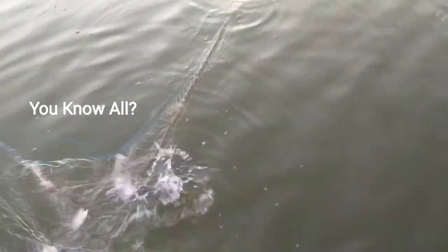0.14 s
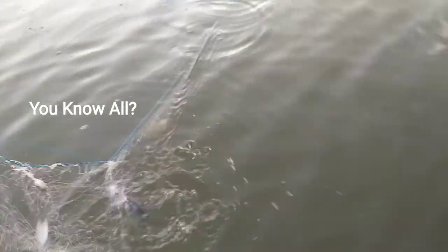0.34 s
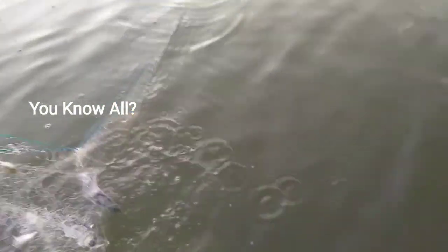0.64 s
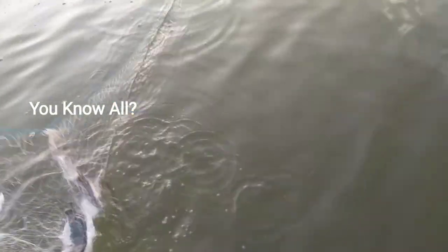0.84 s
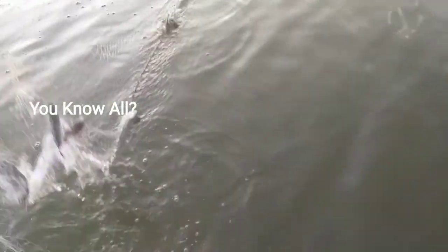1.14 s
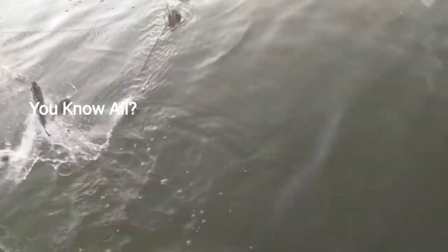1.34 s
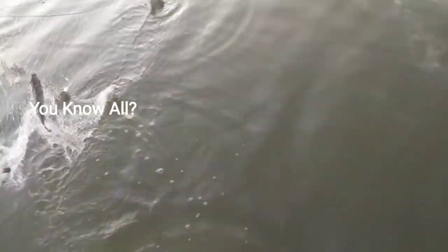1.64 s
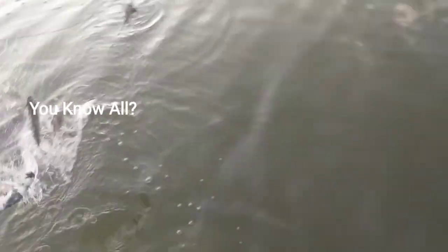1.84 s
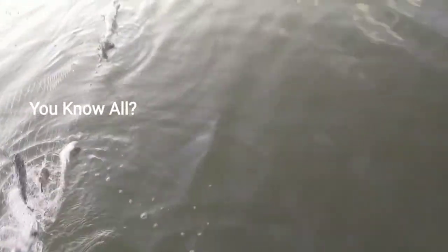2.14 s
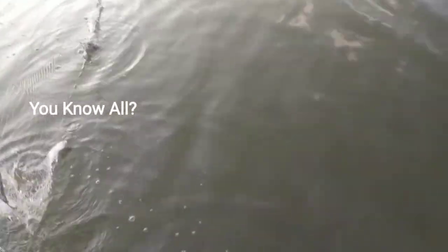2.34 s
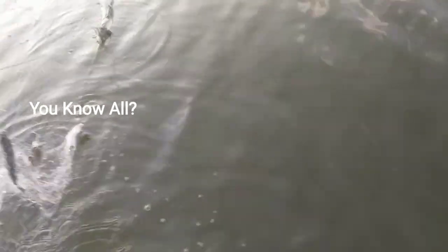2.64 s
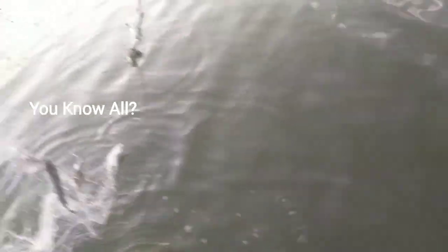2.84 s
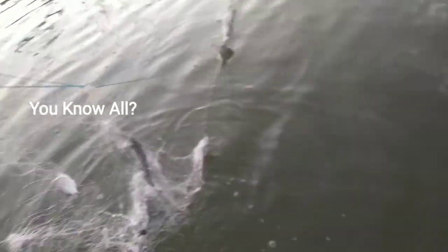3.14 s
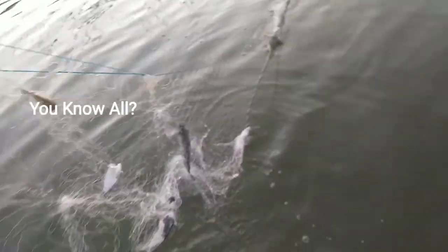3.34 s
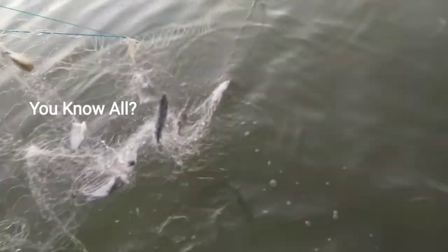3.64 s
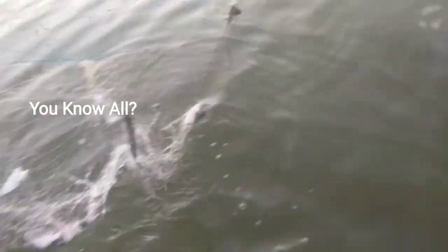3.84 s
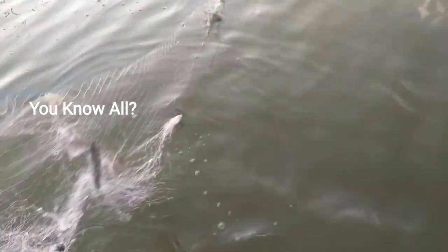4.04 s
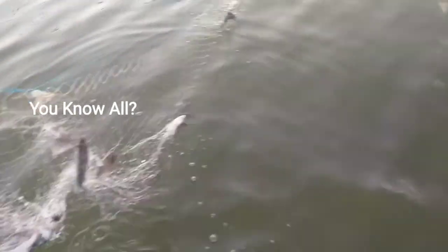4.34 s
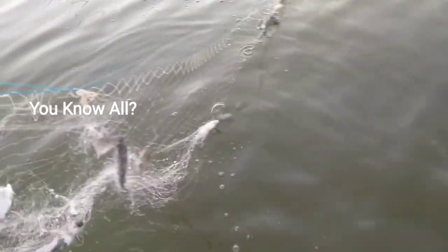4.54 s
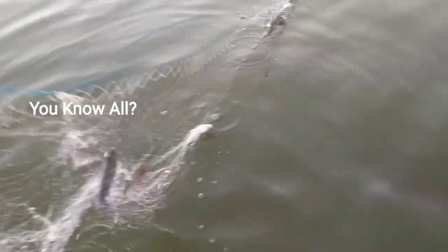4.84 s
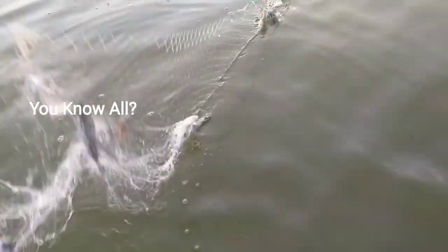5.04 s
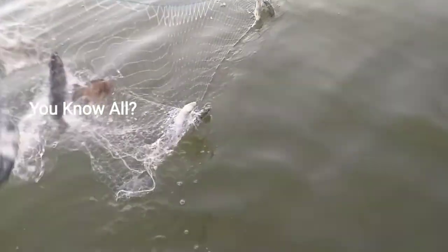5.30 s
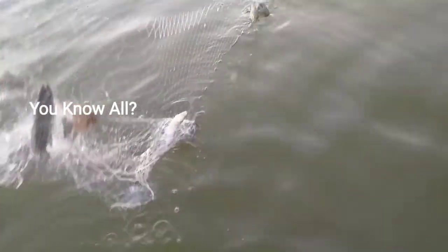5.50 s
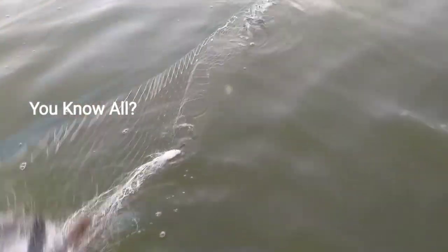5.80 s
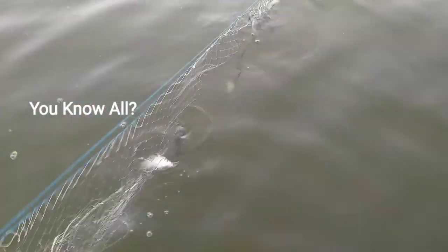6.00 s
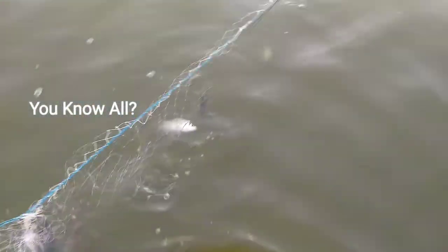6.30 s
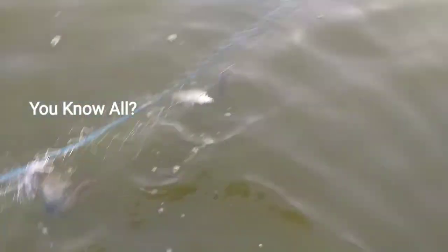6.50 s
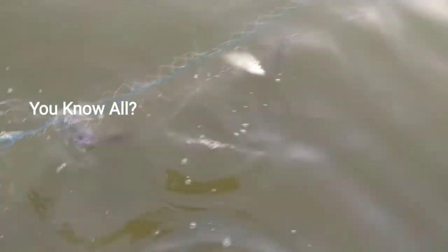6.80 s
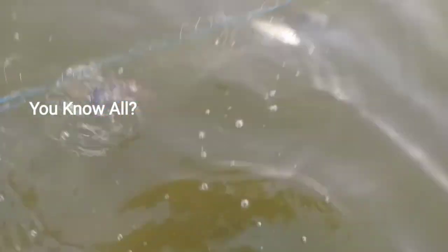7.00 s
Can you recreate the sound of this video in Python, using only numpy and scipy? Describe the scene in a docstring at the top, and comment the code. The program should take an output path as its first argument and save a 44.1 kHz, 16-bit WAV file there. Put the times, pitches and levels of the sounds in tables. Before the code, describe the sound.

Two bouts of close, bright splashing dominate the first half, the first abrupt and spitting, the second fuller with slosh, slaps and gurgling bubbles. Afterwards the lake is quiet, with only tiny drips and little plops. Low wind buffets come and go on the close microphone in open air. Falling bird whistles, rapid high chirps, faint insect rasps and a weak far engine fill the gaps over soft hiss.

```python
"""Splashing water leads: a net with fish is hauled out of a lake by hand, in two bouts of surges.
Burst-modulated noise gives spray and slosh; snapping cavities give smacks; damped tones give bubbles;
sparse ringing grains give drips. Filtered pulses and single eddies of light wind buffet the microphone.
Gliding tones make birds whistle and chirp, gated noise makes insects buzz, and summed harmonics of a
firing rate make a small engine rev far off, over a steady hiss and a thin tone."""
import sys
import numpy as np
from scipy import signal
from scipy.fft import rfft, irfft, next_fast_len
from scipy.io import wavfile
from scipy.ndimage import uniform_filter1d

SR = 44100
rng = np.random.default_rng(int(sys.argv[2]) if len(sys.argv) > 2 else 0)


def transcribe(signal):
    """Save signal, clipped to [-1, 1], as a 16-bit WAV file at the path in sys.argv[1]."""
    frames = np.atleast_2d(signal).T
    limited = np.clip(frames, -1, 1)
    pcm = np.round(limited * 32767).astype(np.int16)
    wavfile.write(sys.argv[1], SR, pcm)


N = 315756


def gain_of(db):
    """Logarithmic level: decibels become an amplitude ratio."""
    return 10 ** (np.asarray(db) / 20)


def evened(x):
    """Power normalisation: scales a signal to rms 1."""
    return x / np.sqrt(np.mean(x ** 2) + 1e-20)


def read(points, hz):
    """Interpolation of a spectrum, linear in its value over log frequency."""
    f, value = np.transpose(points)
    return np.interp(np.log(hz + 1), np.log(f + 1), value)


def colour(x, shape):
    """Linear filtering: multiplies the spectrum by a gain given as a function of frequency."""
    size = next_fast_len(x.shape[-1])
    gain = shape(np.fft.rfftfreq(size, 1 / SR))
    return irfft(rfft(x, size) * gain, size)[..., :x.shape[-1]]


def add(mix, s, sound):
    """Superposition: adds a sound to the mix from time s."""
    part = mix[max(round(s * SR), 0):][:len(sound)]
    part += sound[:len(part)]


def train(per_s, spread_db):
    """Random point process: clicks of either sign, mostly small, a few large."""
    chance = rng.uniform(-1, 1, N) * SR / per_s
    hit = abs(chance) < 1
    size_db = spread_db * np.minimum(-np.log(abs(chance[hit])), 4)
    out = np.zeros(N)
    out[hit] = np.sign(chance[hit]) * gain_of(size_db)
    return out


# Hiss over the lake, relative spectrum: f/Hz, level/dB per Hz
AIR_SPECTRUM = [(150, -37), (250, -13.5), (500, -18.5), (1300, -23.5), (4500, -21), (5800, -17),
                (6300, -15.5), (7500, -15.5), (8400, -6.5), (9500, -22.5), (10500, -31.5), (13000, -21.5),
                (15000, -31.5), (16000, -34.5)]
AIR_DB = -66.5  # rms


def air():
    """Stationary noise: even hiss, made patchy where a far insect chorus swells and fades."""
    frames, hz = N // 128 + 5, np.fft.rfftfreq(512, 1 / SR)
    real, imaginary, patches = rng.standard_normal((frames, 257, 3)).T
    patches = uniform_filter1d(patches, 8, 0)  # smooth over frequency
    patches = evened(uniform_filter1d(patches, 25, 1))  # smooth over time
    patchy_db = 2.2 + 1.4 * np.exp(-((hz - 7000) / 2200) ** 2)  # most uneven near 7 kHz
    level_db = read(AIR_SPECTRUM, hz)[:, None] + patchy_db[:, None] * patches
    frames_spectrum = (real + 1j * imaginary) * gain_of(level_db)
    hiss = signal.istft(frames_spectrum, nperseg=512, noverlap=384)[1][:N]
    return gain_of(AIR_DB) * evened(hiss)


# Thin steady tone: f/Hz, rms level/dB
STEADY_TONE = [(13291, -79)]


def whine():
    """Pure tone: a sinusoid of constant frequency and level."""
    t = np.arange(N) / SR
    return sum(np.sqrt(2) * gain_of(db) * np.sin(2 * np.pi * f * t) for f, db in STEADY_TONE)


# Course of the wind noise: t/s, level/dB
GUST_LEVELS = [(0.03, -49.5), (0.2, -60.5), (0.33, -44), (0.75, -50), (0.95, -39), (1.15, -48), (1.65, -48),
               (1.8, -54.5), (2, -47.5), (2.38, -72), (2.7, -56), (3.3, -60), (3.601, -65.5), (3.72, -44.5),
               (4.05, -55), (4.13, -75), (4.25, -52), (4.42, -56), (4.55, -41.5), (4.95, -54), (5.1, -42),
               (5.42, -53), (5.8, -57), (6.28, -56), (6.45, -59.5), (6.6, -48), (6.8, -60)]
# Relative spectrum of the wind noise: f/Hz, level/dB per Hz
WIND_SPECTRUM = [(15, -45.5), (25, -24), (86, -2), (162, -0.5), (265, -8), (346, -19.5), (483, -33),
                 (717, -48), (1100, -59), (1430, -80), (2420, -120)]


def gusts():
    """Turbulent pressure fluctuation: lumpy pulses and noise, low-frequency coloured."""
    s, db = np.transpose(GUST_LEVELS)
    lumps = evened(train(75, 4.0)) + 0.65 * rng.standard_normal(N)
    rumble = evened(colour(lumps, lambda hz: gain_of(read(WIND_SPECTRUM, hz))))
    return rumble * gain_of(np.interp(np.arange(N) / SR, s, db))


# Strongest eddies thumping the microphone: onset t/s, envelope peak level/dB, centre f/Hz
EDDIES = [(0.061, -30.5, 147), (0.33, -28, 225), (0.38, -24.5, 257), (0.535, -31.5, 113), (0.931, -22, 255),
          (1.003, -25, 235), (1.052, -30.5, 202), (1.09, -25.5, 340), (1.175, -27.5, 156),
          (1.577, -30.5, 150), (1.651, -33.5, 125), (1.983, -28.5, 153), (2.763, -25.5, 250),
          (3.249, -35, 100), (3.677, -33.5, 108), (3.747, -32, 169), (3.768, -31.5, 230),
          (3.809, -32, 180.4), (4.235, -33.5, 148.3), (4.271, -32.5, 146), (4.523, -27.5, 255),
          (4.587, -31, 200), (4.652, -23.5, 215), (4.795, -34.5, 177), (4.871, -28.5, 178),
          (4.96, -28, 127), (5.047, -31, 118), (5.088, -30, 173.5), (5.225, -28, 164),
          (5.266, -31.5, 178.6), (5.295, -30.5, 170), (5.351, -33, 133), (5.439, -37, 119.6),
          (5.636, -39, 149), (5.94, -39, 177), (6.243, -33.5, 154), (6.556, -33.5, 160),
          (6.609, -35.5, 105)]
THUMP_BUILD_S, THUMP_CORE = .0098, .64  # from onset to peak; share of the sharp core


def thumps():
    """Wave packet: each eddy is one short swing of pressure with a sharper core, in random phase."""
    out = np.zeros(N)
    t = np.arange(-900, 900) / SR  # zero at the peak
    for (s, db, hz), turn in zip(EDDIES, rng.random(len(EDDIES))):
        swing = (1 - THUMP_CORE) * np.exp(-(t * hz / 0.77) ** 2)
        core = THUMP_CORE * np.exp(-(t * hz / 0.26) ** 2)
        carrier = np.cos(2 * np.pi * (hz * t + turn))
        add(out, s + THUMP_BUILD_S + t[0], gain_of(db) * carrier * (swing + core))
    return out


# Far engine: t/s, firing rate f/Hz, level/dB
ENGINE_COURSE = [(5.398, 39.4, -63), (5.5, 32.8, -60), (5.6, 39.2, -53), (5.77, 41.3, -58.5),
                 (6.019, 39.6, -55.5), (6.121, 41, -70.5), (6.471, 33.7, -74), (6.891, 27.3, -70.5),
                 (7.16, 30, -62)]


def engine():
    """Harmonic series: one puff a firing; low orders near the pipe resonance carry across the water."""
    s, per_s, db = np.transpose(ENGINE_COURSE)
    t = np.arange(s[0], s[-1], 1 / SR)
    hz = np.interp(t, s, per_s)
    turns = np.cumsum(hz) / SR
    puffs = np.zeros(len(t))
    for order in range(2, 12):
        resonance = 1 / (1 + (np.log(order * hz / 205) / .24) ** 2) ** 1.6  # centred on 205 Hz
        puffs += np.cos(2 * np.pi * order * turns) * resonance
    fade_in = np.minimum((t - s[0]) / 0.11, 1)
    out = np.zeros(N)
    add(out, s[0], gain_of(np.interp(t, s, db)) * evened(puffs) * fade_in)
    return out


def rasp(length, centre_hz, width_hz, per_s):
    """Amplitude modulation: regular wing strokes gate a band of noise."""
    t = np.arange(0, length, 1 / SR)
    noise = rng.standard_normal(2 * SR)
    band = colour(noise, lambda hz: np.exp(-((hz - centre_hz) / width_hz) ** 2))[:len(t)]
    strokes = 0.39 + np.sin(np.pi * per_s * t) ** 2
    return evened(band * strokes) * signal.windows.tukey(len(t), min(0.04 / length, 1))


# High insect buzzes: start t/s, length t/s, level before end fades/dB, centre f/Hz
HIGH_BUZZES = [(1.13, 0.088, -58.5, 8360), (1.475, 0.12, -58, 8130), (1.633, 0.12, -62.5, 7800),
               (1.799, 0.097, -58, 8260), (2.0, 0.12, -60, 7900), (3.502, 0.073, -61.5, 8350),
               (3.826, .1, -66, 8460), (4.171, 0.12, -69, 8400), (4.752, 0.14, -66.5, 7520),
               (4.957, 0.05, -70, 8600), (5.099, 0.25, -68.5, 6660), (5.618, 0.116, -73, 8400),
               (6.3, 0.083, -70.5, 8270), (6.564, 0.1, -69.5, 8400), (6.988, 0.076, -63.5, 7690)]
BUZZ_WIDTH_HZ, BUZZ_PER_S = 850, 200  # noise band; wing strokes


def buzzes():
    """Gated narrow-band noise: short high buzzes."""
    out = np.zeros(N)
    for s, length, db, hz in HIGH_BUZZES:
        add(out, s, gain_of(db) * rasp(length, hz, BUZZ_WIDTH_HZ, BUZZ_PER_S))
    return out


# Low rasps of a further insect: start t/s, length t/s, level before end fades/dB, centre f/Hz
LOW_RASPS = [(3.65, 0.12, -72.5, 3000), (4.03, .05, -73, 2940), (4.505, .08, -78, 2900),
             (4.657, 0.11, -79.5, 2700)]
RASP_WIDTH_HZ, RASP_PER_S = 300, 100  # noise band; wing strokes


def low_rasps():
    """Gated narrow-band noise at a lower centre and stroke rate."""
    out = np.zeros(N)
    for s, length, db, hz in LOW_RASPS:
        add(out, s, gain_of(db) * rasp(length, hz, RASP_WIDTH_HZ, RASP_PER_S))
    return out


# One long trill: start t/s, length t/s, level before fading/dB, centre f/Hz, width f/Hz, stroke rate f/Hz
LONG_TRILL = (3.28, .95, -70, 5150, 230, 41)


def cricket():
    """Gated narrow-band noise with slow strokes, its level falling linearly in decibels."""
    s, length, db, *voice = LONG_TRILL
    trill = rasp(length, *voice)
    out = np.zeros(N)
    add(out, s, gain_of(db + np.linspace(0, -8, len(trill))) * trill)
    return out


def flock():
    """Random superposition: many small birds far off, faint falling chirps in runs of three."""
    out, u = np.zeros(N), np.linspace(0, 1, 1600)
    envelope = np.sin(np.pi * np.minimum(2.3 * u, 1))  # silent for the rest of each chirp period
    for hz in np.geomspace(5500, 7000, num=7):
        chirp = envelope * np.sin(2 * np.pi * np.cumsum(hz * (1 - 0.3 * u)) / SR)
        out += signal.oaconvolve(train(2.6, 2.3), np.tile(chirp, 3))[:N]
    return gain_of(-78.5) * evened(out)


def glide(start_hz, end_hz, length):
    """Frequency modulation: one short chirp whose pitch slides ever faster."""
    u = np.linspace(0, 1, int(length * SR))
    hz = start_hz + (end_hz - start_hz) * u ** 1.71
    return np.sin(np.pi * u) ** 0.34 * np.sin(2 * np.pi * np.cumsum(hz) / SR)


# Lower single calls: start t/s, peak level/dB, start f/Hz, end f/Hz, length t/s
SINGLE_CALLS = [(1.444, -61, 2440, 2450, 0.053), (1.516, -64.5, 2480, 2160, 0.042),
                (4.239, -71, 3510, 2950, .05), (5.245, -66, 3670, 3130, 0.061),
                (5.551, -65, 3670, 2810, 0.076), (5.72, -79, 1700, 1570, .18),
                (6.175, -76, 1620, 1570, 0.086), (6.101, -63, 2830, 2720, 0.084),
                (6.403, -71, 3240, 2965, 0.032), (6.628, -70, 3370, 3030, 0.029)]


def chirps():
    """Frequency glide: one sliding tone a call."""
    out = np.zeros(N)
    for s, db, start_hz, end_hz, length in SINGLE_CALLS:
        add(out, s, gain_of(db) * glide(start_hz, end_hz, length))
    return out


# Runs of quick falling chirps: start t/s, number of chirps (rounded when played), onset spacing t/s,
# peak level/dB of the swell at chirp index (number - 1.5), counted from 0
CHIRP_RUNS = [(1.854, 2.8, 0.043, -50.5), (3.607, 3.15, 0.039, -54), (4.14, 3.4, 0.038, -55.5),
              (4.385, 3, 0.037, -63), (4.926, 3.7, 0.048, -63.5), (5.63, 2.4, .035, -59.5),
              (6.45, 4.2, .033, -69), (6.845, 3.96, .034, -51), (7.114, 1.03, .035, -65)]
TRILL_FROM_HZ, TRILL_TO_HZ, TRILL_NOTE_S = 6650, 6130, 0.0218
SWELL_DB = 3.5  # each chirp louder than the one before


def trills():
    """Periodic repetition: evenly spaced falling glides in a crescendo."""
    out = np.zeros(N)
    for s, number, gap, db in CHIRP_RUNS:
        for k in range(round(number)):
            level_db = db - SWELL_DB * (number - 1.5 - k)
            add(out, s + k * gap, gain_of(level_db) * glide(TRILL_FROM_HZ, TRILL_TO_HZ, TRILL_NOTE_S))
    return out


# Falling whistles of one bird: start t/s, length t/s, top f/Hz, rms level before fading/dB
FALLING_WHISTLES = [(0.586, 0.17, 3990, -45.5), (2.226, 0.15, 3980, -38.5), (4.774, 0.17, 3915, -44)]
WHISTLE_RISE_S, WHISTLE_FADE_DB = 0.035, -11.5  # the fade is complete at the end
SCOOP, SCOOP_S = 0.046, .008  # starts flat by this share of the top pitch; time constant of the rise
LEVEL_S, DROP_HZ_PER_S, BEND_S = .062, 8200, 0.0084  # stays level, then bends into a slide


def whistles():
    """Frequency modulation: a near-pure tone scoops up, stays level, then slides down."""
    out = np.zeros(N)
    for s, length, top_hz, db in FALLING_WHISTLES:
        t = np.arange(0, length, 1 / SR)
        scooped_hz = top_hz * (1 - SCOOP * np.exp(-t / SCOOP_S))
        slide_hz = DROP_HZ_PER_S * BEND_S * np.logaddexp(0, (t - LEVEL_S) / BEND_S)
        tone = np.sqrt(2) * np.sin(2 * np.pi * np.cumsum(scooped_hz - slide_hz) / SR)
        swell = np.minimum(t / WHISTLE_RISE_S, 1) * gain_of(db + WHISTLE_FADE_DB * (t / length) ** 2)
        add(out, s, swell * tone * signal.windows.tukey(len(t), .1))
    return out


def birds():
    """Reverberation: the calls flutter a little in level and return as scattered echoes off the shore."""
    calls = whistles() + trills() + chirps()
    flutter = gain_of(0.68 * evened(uniform_filter1d(rng.standard_normal(N), size=220)))
    t = np.arange(6000) / SR
    echoes = rng.standard_normal(6000) * gain_of(-60 * t / 0.2) * (t > .008)  # 60 dB down in 0.2 s
    echoes /= np.linalg.norm(echoes)
    return calls * flutter + gain_of(-16.0) * signal.oaconvolve(calls, echoes)[:N]


# Relative spectrum of the splashing water: f/Hz, level/dB per Hz
WATER_SPECTRUM = [(240, -46), (400, -10), (598, -4), (865, 0), (1900, -2.5), (2880, -5.5), (4800, -3.5),
                  (12300, -8.5), (16000, -21.5)]


def grains(low_hz, high_hz, per_s, cycles, rise, count):
    """Granular superposition: tiny bubbles ring briefly, gliding up, at random moments."""
    out = np.zeros(N)
    for hz in np.geomspace(low_hz, high_hz, count):
        turns = np.arange(int(4 * cycles * SR / hz)) * hz / SR
        envelope = np.exp(-turns / cycles) * (1 - np.exp(-turns / 2.2))
        ring = np.sin(2 * np.pi * turns * (1 + rise * turns)) * envelope
        weight = hz * gain_of(read(WATER_SPECTRUM, hz))
        out += weight * signal.oaconvolve(train(per_s / count, 3.2), ring)[:N]
    return evened(out)


def spitting(low_hz, high_hz, shared, per_s, spread_db):
    """Modulated noise: a band of hiss spits in bursts, partly with the other bands, partly alone."""
    clicks = shared + evened(abs(train(per_s, spread_db)))
    spits = signal.lfilter([1], [1, -np.exp(-1 / (0.005 * SR))], clicks)  # 5 ms decay

    def band(hz):
        edges = (1 + (low_hz / (hz + 1)) ** 6) * (1 + (hz / high_hz) ** 6)
        return gain_of(read(WATER_SPECTRUM, hz)) / np.sqrt(edges)

    envelope = evened(0.15 + evened(spits) ** 1.206)
    return colour(envelope * rng.standard_normal(N), band)


def drips():
    """Sparse granular noise: faint drips tick at random throughout."""
    return gain_of(-81.5) * grains(8000, 14500, 90, 1.5, 0.0081, count=8)


# Trapped air ringing: start t/s, level before the envelope/dB, start f/Hz, pitch rise (share of start f per s)
AIR_POCKETS = [(0.0006, -53, 1600, -1), (0.1299, -42.5, 988, -10), (0.172, -46, 720, 6.5),
               (0.197, -44.5, 950, 5), (0.2283, -46, 800, 11), (0.4639, -20, 411, 3),
               (0.5613, -32, 1650, 26.5), (0.6135, -34.5, 2630, 7), (0.6673, -43, 945, -2),
               (0.7245, -42, 860, 14), (0.7685, -30.5, 950, -0.5), (0.774, -23.5, 3560, 5),
               (0.828, -40.5, 1000, 25.5), (0.8676, -40, 1022, 38), (0.9024, -30, 506, 18),
               (0.9726, -43, 660, 4.7), (1.021, -41, 943, 31), (1.11, -59, 1190, 2),
               (1.465, -55.5, 780, -1), (2.0375, -45, 540, 15), (2.0713, -45, 1170, 4),
               (2.0955, -34, 1190, 45), (2.1552, -22.5, 570, 6), (2.192, -42, 1260, 32),
               (2.3083, -38, 834, 40.5), (2.4268, -29, 1353, -5.5), (2.6375, -39, 430, -13.5),
               (2.6928, -35.5, 1710, 15), (2.8781, -30, 1954, -6), (3.0597, -29, 554, 12.5),
               (3.0985, -35, 369, 14), (3.1381, -41.5, 754, 9), (3.1994, -42.5, 582, 13),
               (3.2232, -46, 757, 7), (3.29, -53, 610, 0.5), (3.5202, -61, 1105, 4), (3.53, -60, 519, 5.5),
               (4.2826, -64, 1423, -4.5), (5.369, -61.5, 1273, 2), (5.4185, -56.5, 1704, 5),
               (5.4424, -54, 2340, -1), (5.5331, -54.5, 2930, 7), (5.5507, -59, 1165, -3),
               (5.5617, -57, 626, 0), (5.6726, -55, 1270, 29), (6.1414, -58, 1330, 1),
               (6.1706, -59.5, 880, 1.5), (6.6255, -62, 1218, -3)]
BUBBLE_LIFE_S, BUBBLE_SIZE_LAW = .03, 0.6  # life at 1 kHz; bigger, lower bubbles last longer
BUBBLE_FADE_DB = -27  # fading over its life


def bubbles():
    """Volume resonance: damped tones whose pitch drifts as the air pocket nears the surface."""
    out = np.zeros(N)
    for s, db, hz, rise in AIR_POCKETS:
        life = BUBBLE_LIFE_S * (1e3 / hz) ** BUBBLE_SIZE_LAW
        t = np.arange(0, life + 0.0028, 1 / SR)
        onset = 1 - np.exp(-t * hz / 0.46)
        ending = np.clip((t[-1] - t) / 0.0055, 0, 1)
        shape = onset * ending * gain_of(BUBBLE_FADE_DB * t / life)
        add(out, s, gain_of(db) * shape * np.sin(2 * np.pi * hz * (t + rise * t ** 2 / 2)))
    return out


# Drops and slaps that strike the water: start t/s, level before the part weights/dB, centre f/Hz
WATER_STRIKES = [(0.1144, -17, 6740), (0.141, -17, 4600), (0.225, -18, 4430), (0.2639, -14.5, 5960),
                 (0.288, -16.5, 4200), (0.3585, -8.5, 5640), (0.3842, -19.5, 2250), (0.427, -8, 5850),
                 (0.439, -20, 5060), (0.4509, -12, 2440), (0.456, -6, 5030), (0.4627, -7, 5330),
                 (0.5992, -23, 4230), (0.612, -26, 4040), (0.6345, -21.5, 3660), (0.6776, -20.5, 3380),
                 (0.7737, -7, 3560), (0.7915, -8.5, 5880), (0.821, -20, 3300), (0.852, -15, 3520),
                 (0.8931, -18.5, 4670), (0.9141, -21, 2530), (0.9925, -29, 3420), (1.295, -27, 5860),
                 (1.46, -8.5, 5400), (1.5102, -24.5, 6040), (1.5256, -25, 7150), (1.628, -45, 2500),
                 (1.8098, -33, 3200), (1.8335, -36, 3320), (1.8935, -27.5, 6370), (1.925, -30, 5840),
                 (2.0685, -25, 7540), (2.153, -21, 1720), (2.205, -23, 1720), (2.231, -33, 4500),
                 (2.279, -14, 4350), (2.4142, -15, 3780), (2.465, -12.5, 3770), (2.4765, -20, 3900),
                 (2.4854, -19, 4300), (2.513, -13, 4650), (2.5986, -4, 5530), (2.611, -5.5, 2420),
                 (2.6221, -4.5, 4100), (2.7028, -16, 3080), (2.762, -13.5, 5160), (2.7758, -11.5, 4800),
                 (2.805, -8.5, 4900), (2.9826, -18.5, 3440), (3.0358, -9, 5360), (3.057, -16.5, 2600),
                 (3.1, -17.5, 2610), (3.1363, -18, 4600), (3.1444, -15.5, 5070), (3.2699, -25.5, 2410),
                 (3.344, -32, 4200), (3.7244, -30, 7140), (3.8882, -40, 5280), (5.453, -30, 10400),
                 (6.0648, -32, 7170), (6.132, -34, 8070), (6.144, -36, 4500), (6.1704, -33, 8410),
                 (6.086, -40, 8200), (6.245, -35.5, 7560), (6.3407, -38, 6720), (6.6, -47.5, 4800),
                 (6.2993, -32.5, 8400), (6.957, -30, 6373), (6.964, -39.5, 6190), (6.984, -30.5, 8340)]


def smacks():
    """Cavity collapse: a cavity snaps shut in about three cycles, with a crack of noise around its pitch."""
    out, t = np.zeros(N), np.arange(512) / SR
    for (s, db, hz), noise in zip(WATER_STRIKES, rng.standard_normal((len(WATER_STRIKES), 512))):
        crack = colour(noise, lambda f: 1 / (1 + (0.79 * hz / (f + 1)) ** 4) / (1 + (f / (1.5 * hz)) ** 4))
        crack = evened(crack) * t / 0.0012 * np.exp(1 - t / 0.00082)
        snap = np.sin(2 * np.pi * hz * t) * np.exp(-((hz * t - 2.2) / 1.6) ** 2)
        add(out, s, gain_of(db) * (0.16 * crack + 0.41 * snap))
    return out


# Froth settling: t/s, level of its noise part/dB
FROTH_LEVELS = [(.85, -71), (1.05, -57.5), (1.35, -60.5), (1.55, -65.5), (1.75, -77)]


def froth():
    """Band-limited noise with fine grains: froth hisses on as it settles."""
    s, db = np.transpose(FROTH_LEVELS)
    noise = rng.standard_normal(N)
    hiss = colour(noise, lambda hz: np.exp(-(np.log(hz / 5600 + 1e-9) / 0.49) ** 2))
    fizz = grains(3200, 13000, 200, 1.8, 0.021, count=8)
    level_db = np.interp(np.arange(N) / SR, s, db, -120, -120)
    return (evened(hiss) + 0.45 * fizz) * gain_of(level_db)


# Surges of water as the fish thrash and the net lifts: start t/s, build t/s, hold t/s,
# spray envelope level/dB, slosh envelope level relative to the spray/dB
WATER_SURGES = [(0, 0.04, 0.16, -60, -12.5), (0.086, 0.064, 0.049, -38.5, -19),
                (0.238, .03, 0.093, -54, -41), (0.351, 0.0069, 0.016, -29, -23),
                (0.387, 0.024, 0.027, -34, -3), (0.446, .008, 0.0047, -28.5, -19.5),
                (0.507, 0.022, .045, -53, -17), (0.574, 0.08, 0.099, -43, -24.5),
                (0.748, 0.035, 0.13, -44.5, -1), (0.905, 0.019, 0.12, -56.5, -2),
                (2.082, 0.051, 0.026, -55.5, 2.5), (2.148, .014, 0.11, -48, 4.5),
                (2.247, 0.093, 0.1, -44.5, 0), (2.422, 0.032, 0.07, -38, -9.5),
                (2.583, 0.024, 0.014, -32, -4), (2.663, 0.025, 0.077, -48.5, -0.5),
                (2.749, 0.013, 0.056, -34.5, 1), (2.836, 0.015, 0.11, -57.5, 5),
                (2.957, 0.033, 0.12, -43.5, 0), (3.122, 0.016, 0.092, -56.5, -4),
                (3.228, 0.024, 0.076, -53.5, -3.5), (5.412, 0.1, 0.18, -76.5, 4),
                (6.109, 0.018, 0.013, -58, -21)]
SURGE_FALL_DB_PER_S = 422.5
RUNOFF_DB, RUNOFF_FALL_DB_PER_S = -17.5, 129.5  # water draining back, relative to its surge
RUNOFF_SLOSH_DB = -5  # the slosh runs off fainter still


def surges(slosh):
    """Exponential decay: a surge rises, holds and falls fast; a fainter, slower runoff follows it."""
    t, power = np.arange(N) / SR, np.zeros(N)
    for s, build, hold, spray_db, slosh_db in WATER_SURGES:
        after = np.maximum(t - s - build - hold, 0)
        runoff = gain_of(RUNOFF_DB + slosh * RUNOFF_SLOSH_DB - RUNOFF_FALL_DB_PER_S * after)
        rise = np.clip((t - s) / build, 0, 1) ** 2
        shape = rise * (gain_of(-SURGE_FALL_DB_PER_S * after) + runoff)
        power += (gain_of(spray_db + slosh * slosh_db) * shape) ** 2
    return np.sqrt(power)


def spray(shared):
    """High-band modulated noise: spitting treble plus the fizz of tiny bubbles."""
    treble = spitting(2500, 5000, shared, 150, 1.3)
    treble += spitting(4660, 6800, shared, 160, 10.0)
    treble += spitting(14000, 24000, shared, 202.6, 5.9)
    fizz = grains(2800, 13000, 900, 6.6, 0.0078, count=14)
    return gain_of(-0.5) * evened(treble) + gain_of(-4.0) * fizz


def slosh(shared):
    """Low-band modulated noise: a duller rush plus larger bubbles."""
    rush = spitting(2100, 2800, shared, 86.5, 3.5) + spitting(347, 2000, shared, 66, 2.7)
    large_bubbles = grains(400, 3000, 230, 4.2, .005, count=22)
    return gain_of(-3.5) * evened(rush) + gain_of(-2.5) * large_bubbles


def splash():
    """Common modulation: spray and slosh share spits and surge together; froth is added."""
    shared = 0.45 * evened(abs(train(62, 5.9)))
    return surges(False) * spray(shared) + surges(True) * slosh(shared) + froth()


def scene():
    """Superposition: everything reaches two close microphone ports alike."""
    mix = air() + whine() + gusts() + thumps() + engine()
    mix += buzzes() + low_rasps() + cricket() + flock() + birds()
    mix += drips() + bubbles() + smacks() + splash()
    return np.array([mix, mix])


# Difference between the ports: f/Hz, left minus right level/dB
PORT_DIFFERENCE = [(900, 0), (1300, 0), (1800, 4.5), (2700, 0), (8500, 1), (10000, -5), (11500, 0.5)]
EDGE_HZ = 15800  # upper band limit


def record(dry):
    """Transducer response: deepest bass cut, ports differing in two narrow bands, then a band limit."""
    def response(hz):
        difference_db = np.outer([.5, -.5], read(PORT_DIFFERENCE, hz))
        return gain_of(difference_db) / np.sqrt(1 + (58 / (hz + 1)) ** 4)

    ports = colour(dry, response)
    low_pass = signal.firwin(255, EDGE_HZ, window=("kaiser", 9), fs=SR)
    return signal.oaconvolve(ports, low_pass[None], "same")


dry = scene()
out = record(dry)
transcribe(out)
```